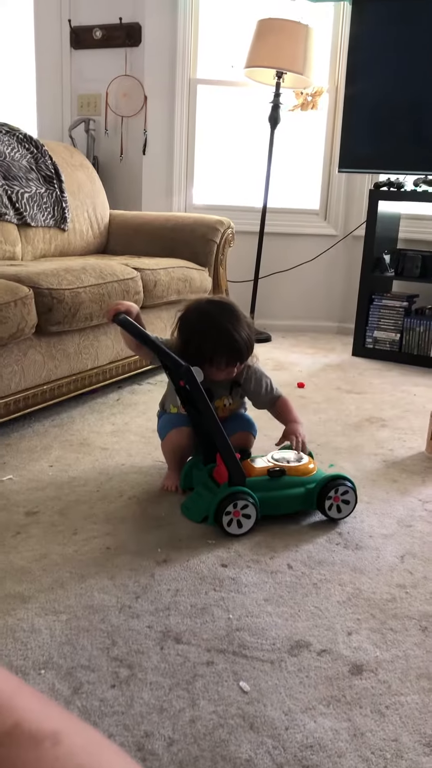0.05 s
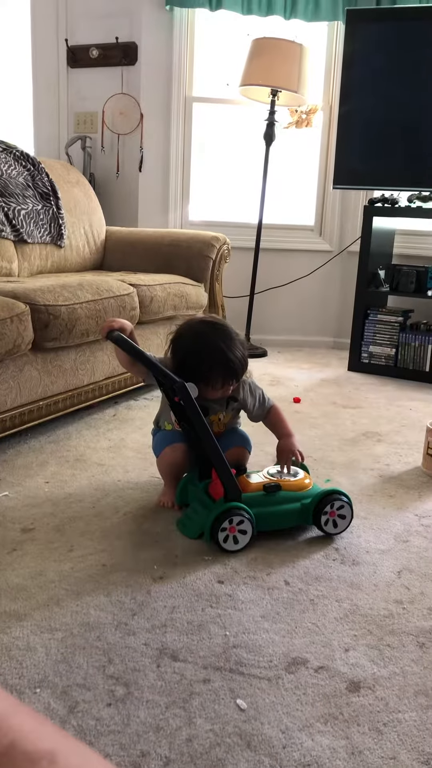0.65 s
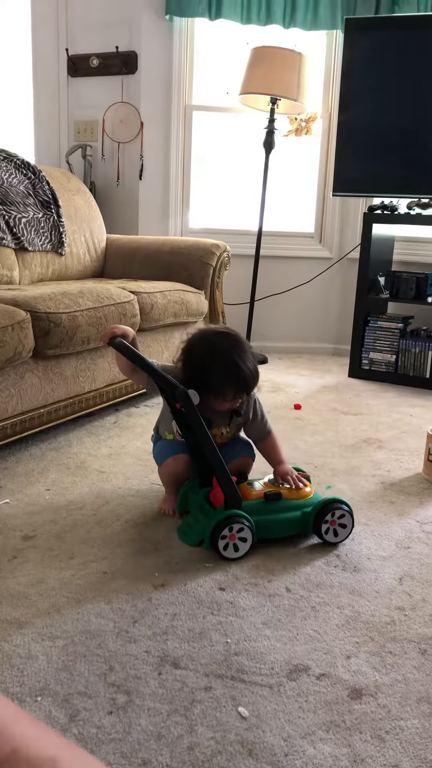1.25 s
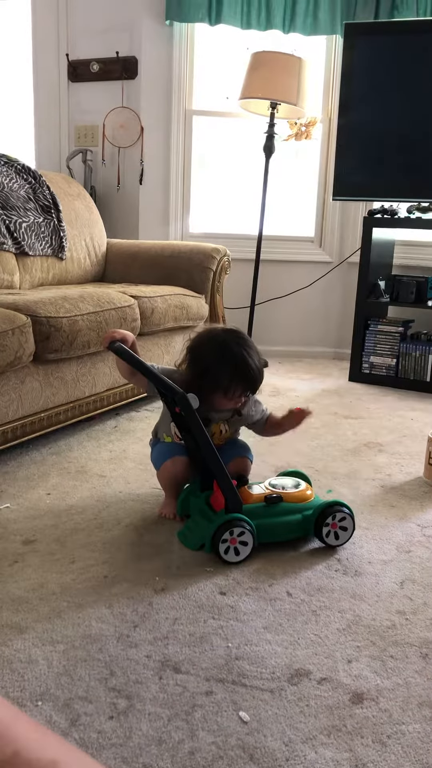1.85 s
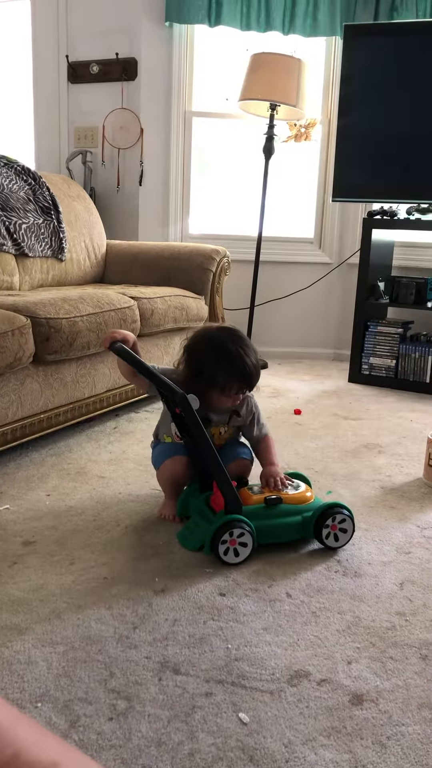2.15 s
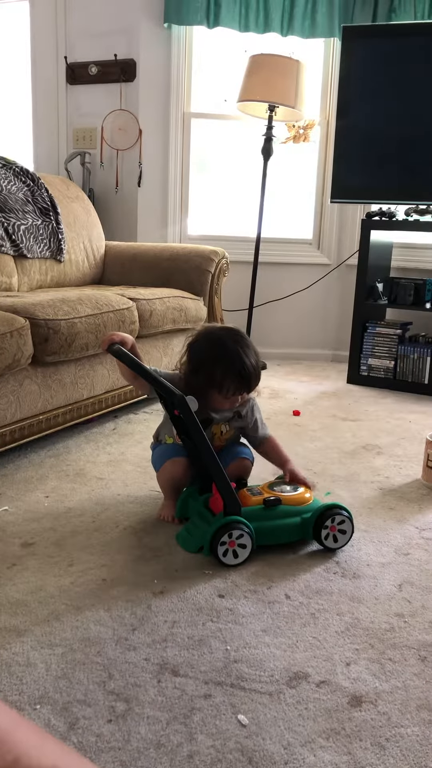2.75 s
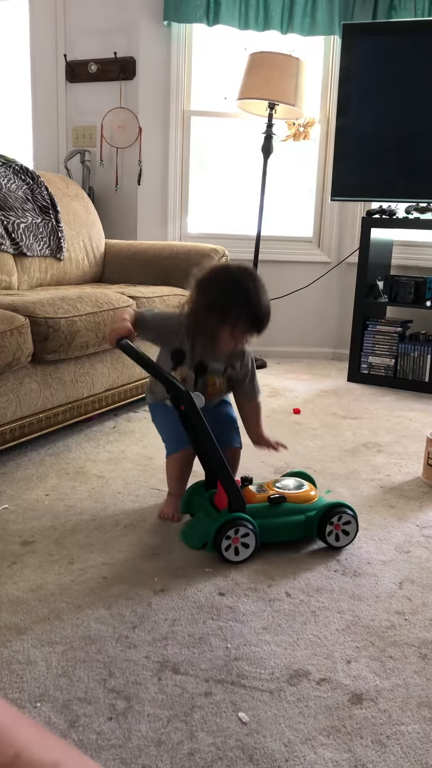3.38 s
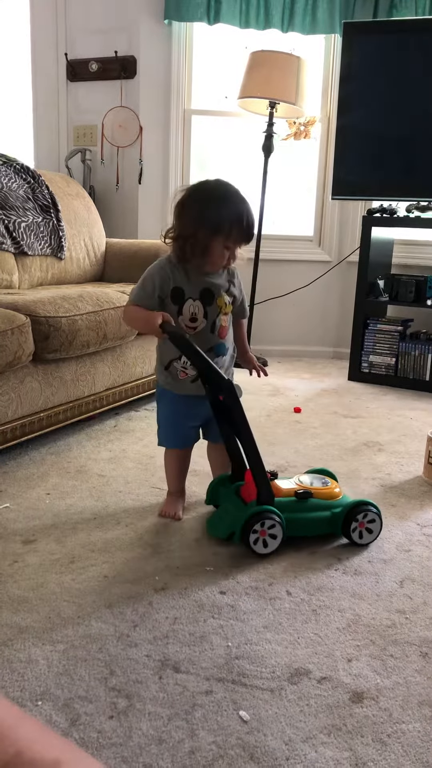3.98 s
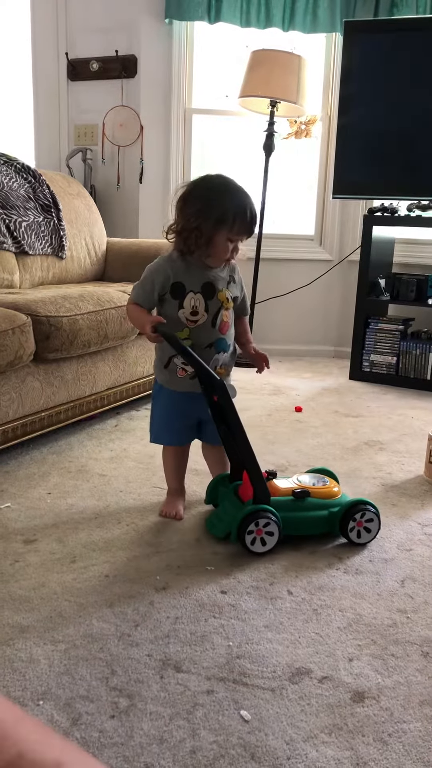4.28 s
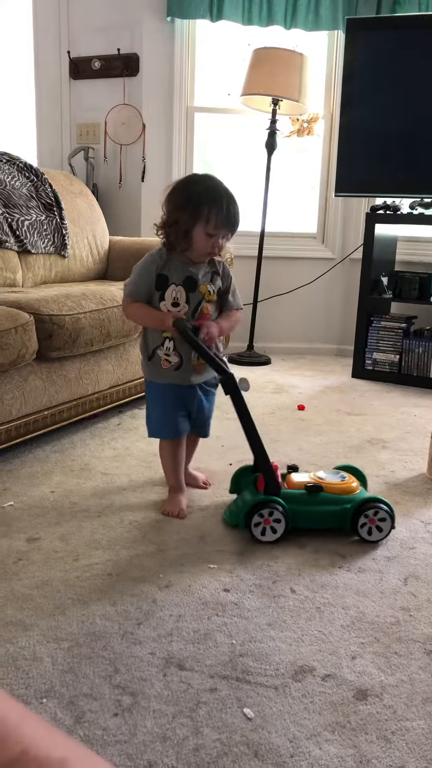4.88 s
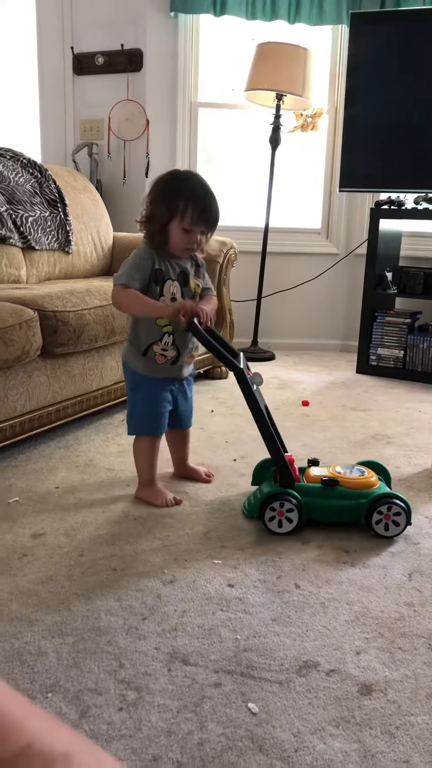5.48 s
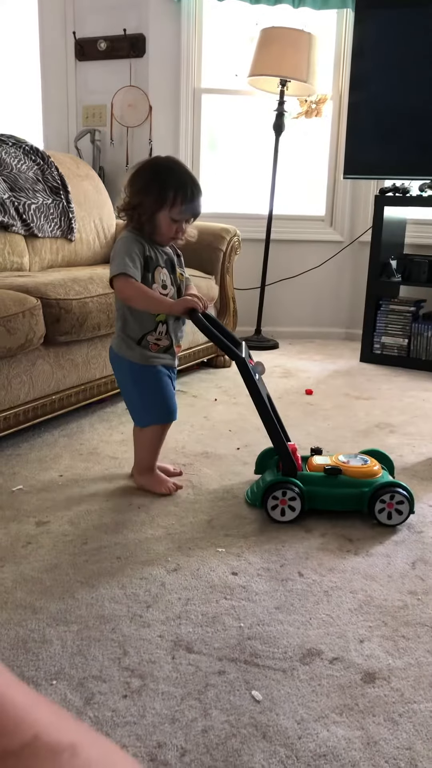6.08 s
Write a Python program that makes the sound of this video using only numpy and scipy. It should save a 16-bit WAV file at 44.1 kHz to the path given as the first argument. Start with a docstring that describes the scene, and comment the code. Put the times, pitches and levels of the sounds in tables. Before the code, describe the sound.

A hollow plastic toy mower is slapped, clatters down on its wheels, creaks and rolls softly over carpet in a quiet room.

```python
"""A hollow plastic toy mower, handled by a toddler on living-room carpet a few steps away.
A hand slaps its top, fingers tick and squeak on it, the deck drops back on its wheels and rattles.
Each blow is a clack of the thin shell plus a thump of the flexing deck. The handle joint snaps and
creaks, then the wheels roll slowly over the pile. The room hums faintly and answers each clack."""
import sys
import numpy as np
from scipy import signal
from scipy.fft import rfft, irfft
from scipy.io import wavfile

SR = 44100
rng = np.random.default_rng(int(sys.argv[2]) if len(sys.argv) > 2 else 0)


def wav_record(signal):
    """Record a signal, one row per channel, as 16-bit PCM in the file named by sys.argv[1]."""
    frames = np.transpose(np.atleast_2d(signal))
    bounded = np.clip(frames, -1, 1)
    # unit amplitude maps onto the largest positive 16-bit level
    quanta = np.round(bounded * 32767).astype(np.int16)
    wavfile.write(sys.argv[1], SR, quanta)


N = 274504
HIT_SAMPLES = SR * 2 // 5

# Spectra. Each row: frequency in Hz, relative level in dB.
CLACK_SPECTRUM = [(40, -24.5), (110, -14.5), (240, -2), (490, -3), (700, -6), (1000, -2.5), (1900, -2),
                  (3000, -3.5), (5500, -7.5), (6900, -9.5), (7700, -10), (8600, -11), (12000, -15.5),
                  (16000, -22)]  # plastic on plastic
DECK_PUSH_SPECTRUM = [(40, -25), (100, -14), (140, -18), (215, 1), (290, 6), (400, 2), (600, -12.5),
                      (1200, -32.5), (4000, -80.5), (16000, -88)]  # whole deck giving way
AIR_SPECTRUM = [(15, -33), (25, -28), (46, -4.5), (113, -8), (140, -8), (204, -3.5), (227, -13),
                (399, -10.5), (495, -16.5), (614, -21.5), (1110, -23.5), (1240, -26), (1750, -30),
                (9050, -37.5), (15500, -39.5)]
PILE_SPECTRUM = [(60, -2), (200, 8), (310, 8.5), (480, 3), (900, 0.5), (1700, -4.5), (2600, -6),
                 (4000, -10.5), (6500, -11), (10000, -11), (16000, -15)]
JOINT_SPECTRUM = [(100, -25), (500, 0), (1000, -1), (1700, 5), (2400, -8.5), (3300, -8), (5500, -18.5),
                  (8000, -25), (16000, -43)]
# Modes. Each row: frequency in Hz, relative level in dB, T60 in seconds.
PANEL_MODES = [(778, 7, 0.25), (928, 13.5, 0.11), (1059, 3.5, 0.38), (1142, 11.5, 0.12), (1307, -16, 0.13),
               (1590, 9, 0.14), (1716, 1.5, 0.16), (1920, -3.5, 0.04), (1905, 0, 0.067), (2550, -5, 0.18),
               (2650, 9, 0.097), (3160, -2, 0.38), (3260, 2, 0.11), (3720, -14, 0.057)]
DECK_MODES = [(62.2, -20, 0.21), (138.5, -4.5, 0.26), (167, -3.5, 0.23), (227, -4, 0.094),
              (250, -6.5, 0.073), (312, -0.5, 0.35), (344, 4.5, 0.18), (390.3, -19, 0.97),
              (406, -12.5, 0.34), (544.5, -27.5, 0.26)]
# Room decay. Each row: frequency in Hz, T60 in seconds.
ROOM_DECAY = [(100, 0.41), (400, 0.35), (1100, 0.43), (2500, 0.37), (5000, 0.37), (8000, 0.31),
              (15000, 0.26)]
# Near surfaces. Each row: nominal delay in seconds, relative level in dB.
ROOM_ECHOES = [(.0049, -3), (.0074, -11.5), (0.0158, -11), (0.0174, -1), (.0222, -32), (0.0373, -19)]
# Opening clack, slap on top, rear then front of the dropping deck. Each row: start in seconds,
# clack level in dB, tilt in dB per octave, treble corner in Hz, part resonance in Hz,
# thump level in dB, bass cut in Hz, lead contact gap in seconds, main contact length in seconds.
HARD_BLOWS = [(-.026, -22.5, -1.5, 11000, 1460, -32, 240, .006, 0.019),
              (2.1044, -15.5, -2.5, 16040, 1855, -20, 71.6, 0.0023, .005),
              (3.656, -29.5, -1, 4260, 2280, -23.5, 210, 0.0024, 0.052),
              (3.679, -15, 0, 9500, 950, -17.5, 257, 0.0035, .014)]
# Steel axle. Each row: start in seconds, frequency in Hz, level in dB.
AXLE_CHINKS = [(-.002, 9830, -45.5), (3.6772, 7750, -32)]
# Household drones. Each row: centre in Hz, width in Hz, level in dB.
DRONES = [(57.7, 3, -82.5), (117.6, 4.9, -75.5), (208.7, 27.5, -71), (8670, 920, -92)]
# Deck rocking. Each row: start in seconds, knock level in dB, treble corner in Hz, thump level in dB.
WHEEL_BUMPS = [(.492, -67, 1470, -50.5), (.724, -53.5, 3000, -44.5), (1.209, -48, 7000, -40),
               (3.346, -51, 3500, -40.5), (3.604, -50, 4420, -47), (3.910, -49, 5060, -36.5),
               (4.201, -52.5, 1800, -39), (4.23, -80, 1180, -52.5), (4.629, -36.5, 3863, -31.5),
               (4.752, -55, 5000, -51), (5.061, -53, 1300, -58), (5.53, -78, 2990, -46),
               (5.986, -73, 3030, -47)]
# Fingers and loose parts. Each row: start in seconds, level in dB, contact length in seconds,
# treble corner in Hz, part resonance in Hz.
SHELL_TICKS = [(1.201, -52.5, 0.022, 8000, 2510), (1.265, -57, 0.055, 3000, 2300),
               (1.738, -59.5, .07, 4000, 2920), (1.764, -64, 0.083, 12000, 2800),
               (2.353, -57.5, 0.053, 3030, 2280), (2.828, -55, 0.074, 9900, 6900),
               (2.914, -42, 0.21, 6640, 1260), (3.502, -57, 0.11, 2940, 2330),
               (3.64, -51, 0.035, 3870, 3030)]
# Skin slides off the top; later a wheel catches.
# Each row: start in seconds, length in seconds, pitch in Hz, relative level in dB.
PLASTIC_SQUEAKS = [(1.601, 0.031, 3780, -64.5), (4.932, 0.021, 1700, -65)]
# Rolling: a nudge, then a push. Each row: time in seconds, relative level in dB.
NUDGE_LEVELS = [(3.08, -81), (3.404, -77), (3.428, -84), (3.58, -77)]
PUSH_LEVELS = [(4.72, -76), (4.95, -71.5), (5.052, -78), (5.144, -72.5), (5.304, -80.5), (5.712, -78),
               (5.956, -81.5), (5.988, -82), (6.2, -82.5)]
# Handle joint. Each row: start in seconds, snap level in dB, relative creak level in dB.
HANDLE_SLIPS = [(3.893, -44, -54.5), (3.9668, -42.5, -56.5), (4.008, -48, -61.5), (4.152, -57, -66)]
# Dragging wheel. Each row: start in seconds, length in seconds, level in dB.
WHEEL_DRAGS = [(5.086, 0.24, -65.5)]


def amp(db):
    """Decibels to gain."""
    return 10 ** (np.asarray(db) / 20)


def unit_rms(x):
    """Scale to mean power 1."""
    return x / np.sqrt(np.mean(x ** 2) + 1e-20)


def unit_energy(x):
    """Scale to total energy 1."""
    return x / (np.linalg.norm(x) + 1e-20)


def lookup(table, hz):
    """Interpolate on a log-frequency axis."""
    table_hz, values = np.transpose(table)
    return np.interp(np.log(hz + 1), np.log(table_hz + 1), values)


def add(mix, start_s, sound):
    """Mix in place; the start may be negative."""
    start = round(start_s * SR)
    sound = sound[max(-start, 0):]
    span = mix[max(start, 0):][:len(sound)]
    span += sound[:len(span)]


def envelope(start_s, length_s, rise_s, fall_s):
    """Trapezoid gain per sample."""
    t = np.arange(N) / SR - start_s
    return np.clip(np.minimum(t / rise_s, (length_s - t) / fall_s), 0, 1)


def colour(x, spectrum, tilt_db_oct=0, corner_hz=np.inf, size=2048):
    """Minimum-phase filter: spectrum, tilt about 2 kHz, treble roll-off."""
    hz = abs(np.fft.fftfreq(size, 1 / SR))
    octaves = np.log2(np.maximum(hz, 500) / 2000)
    gain = amp(lookup(spectrum, hz) + tilt_db_oct * octaves) / np.hypot(1, (hz / corner_hz) ** 2)
    min_phase = np.exp(np.conj(signal.hilbert(np.log(gain))))
    taps = np.fft.ifft(min_phase).real[:size // 2]
    return signal.fftconvolve(x, taps)[:len(x)]


def narrow_noise(hz, width_hz):
    """Noise through one steep resonance."""
    detune = 2 * (np.fft.rfftfreq(N, 1 / SR) - hz) / width_hz
    return unit_rms(irfft(rfft(rng.standard_normal(N)) / (1 + detune ** 2), N))


def slips(per_s, spread_db):
    """Random stick-slip clicks of uneven size."""
    sizes = amp(spread_db * np.minimum(rng.exponential(1, N), 4))
    signs = rng.choice([-1., 1.], N)
    return unit_rms(sizes * signs * (rng.random(N) < per_s / SR))


def ring(modes, t):
    """One decaying sine per mode."""
    hz, db, t60_s = np.transpose(modes)[:, :, None]
    return amp(db - 60 * t / t60_s) * np.sin(2 * np.pi * hz * t)


def strike(modes, t):
    """Each contact point drives the modes with its own signs and strengths."""
    weights = rng.choice([-1., 1.], len(modes)) * rng.uniform(0.33, 1, len(modes))
    return unit_energy(weights @ ring(modes, t))


def room(wet_db, echoes_db=-2, build_s=0.0015):
    """Impulse response: direct sound, near echoes, diffuse tail whose treble dies first."""
    hz, t, bands = signal.stft(rng.choice([-1., 1.], SR // 2), SR, nperseg=256)
    decay = amp(-60 * t / lookup(ROOM_DECAY, hz)[:, None])
    bands = bands * decay * (1 - np.exp(-t / build_s))
    response = amp(wet_db) * unit_energy(signal.istft(bands, SR, nperseg=256)[1])
    response[0] += 1
    for delay_s, db in ROOM_ECHOES:
        response[round(delay_s * rng.uniform(.85, 1.15) * SR)] += amp(db + echoes_db)
    return response


def reverb(x, response):
    """Pass through the room, same length."""
    return signal.oaconvolve(x, response)[:len(x)]


def contact_gain(db):
    """Gain of a contact whose energy, packed into 1 ms, has this level."""
    return amp(db) * np.sqrt(SR / 1000)


def burst(t, t60_s, size=4096):
    """The thin shell spreads a click into a dense, decaying flurry."""
    fade = amp(-60 * t[:size] / t60_s)
    flurry = rng.standard_normal(size) * fade
    for _ in range(3):
        whitened = irfft(np.exp(1j * np.angle(rfft(flurry))), size)
        flurry = whitened * fade ** .25
    return np.pad(unit_energy(flurry), (0, len(t) - size))


def shell_clack(db, contact_s, tilt_db_oct, corner_hz, part_hz):
    """Contact snap, loose-part chatter and panel ring, lifted at the struck part's resonance."""
    t = np.arange(HIT_SAMPLES) / SR
    response = room(wet_db=-1.5, echoes_db=-2.5)
    snap = reverb(burst(t, contact_s), response)
    chatter = amp(-2) * burst(t, t60_s=0.015)
    panels = amp(-12) * strike(PANEL_MODES, t)
    clack = snap + chatter + panels
    resonance = signal.iirpeak(part_hz, Q=5.2, fs=SR)
    clack += amp(4) * signal.lfilter(*resonance, clack)
    return contact_gain(db) * unit_energy(colour(clack, CLACK_SPECTRUM, tilt_db_oct, corner_hz))


def deck_thump(db, bass_cut_hz, flex_s=0.00033):
    """The hollow deck gives way as a whole, then its modes ring on."""
    t = np.arange(HIT_SAMPLES) / SR
    push = unit_energy(colour(room(wet_db=-1)[:len(t)], DECK_PUSH_SPECTRUM))
    ringing = amp(-2) * strike(DECK_MODES, t) * (1 - np.exp(-t / flex_s))
    bass_cut = signal.butter(2, bass_cut_hz, "high", fs=SR)
    return contact_gain(db) * unit_energy(signal.lfilter(*bass_cut, push + ringing))


def blows(glance_ratio=1.7, scatter_oct=0.95):
    """Edges touch, weak and bright; the full weight lands; the shell rebounds, ever weaker and duller."""
    out = np.zeros(N)
    for start_s, db, tilt_db_oct, corner_hz, part_hz, thump_db, cut_hz, gap_s, contact_s in HARD_BLOWS:
        add(out, start_s, shell_clack(db, contact_s, tilt_db_oct, corner_hz, part_hz))
        add(out, start_s, deck_thump(thump_db, cut_hz))
        leads = [(-k * gap_s, db - 7 * k, tilt_db_oct + 1.5 * k, 3.6 * corner_hz) for k in (1, 2)]
        rebounds = [(k * gap_s * 1.8, db - 5.5 - 4.5 * k, tilt_db_oct - 1.5 * k, corner_hz)
                    for k in (1, 2, 3, 4)]
        for delay_s, glance_db, slope_db_oct, treble_hz in leads + rebounds:
            other_part_hz = part_hz * 2 ** (scatter_oct * rng.uniform(-1, 1))
            glance = shell_clack(glance_db, contact_s * glance_ratio, slope_db_oct, treble_hz, other_part_hz)
            add(out, start_s + delay_s, glance)
    return out


def axle_chinks(t60_s=0.011):
    """A jolted steel axle rings briefly in its seat."""
    out, t = np.zeros(N), np.arange(SR // 2) / SR
    for start_s, hz, db in AXLE_CHINKS:
        chink = reverb(ring([(hz, 0, t60_s)], t)[0], room(wet_db=-7))
        add(out, start_s, contact_gain(db) * unit_energy(chink))
    return out


def room_tone(air_db=-66):
    """Steady rumble, hiss and household drones."""
    air = amp(air_db) * unit_rms(colour(rng.standard_normal(N), AIR_SPECTRUM, size=16384))
    return air + sum(amp(db) * narrow_noise(hz, width_hz) for hz, width_hz, db in DRONES)


def wheel_bumps(contact_s=0.029, tilt_db_oct=-3, lead_s=0.006, lag_s=0.00293):
    """A wheel takes up its play, knocks at the axle, then the deck thumps."""
    out = np.zeros(N)
    for start_s, db, corner_hz, thump_db in WHEEL_BUMPS:
        add(out, start_s - lead_s, shell_clack(db - 11, contact_s, tilt_db_oct, corner_hz, part_hz=1100))
        add(out, start_s, shell_clack(db, contact_s, tilt_db_oct, corner_hz, part_hz=840))
        add(out, start_s + lag_s, deck_thump(thump_db, bass_cut_hz=190))
    return out


def shell_ticks(tilt_db_oct=0.5):
    """Light sliding touches, too weak to move the deck."""
    out = np.zeros(N)
    for start_s, db, contact_s, corner_hz, part_hz in SHELL_TICKS:
        add(out, start_s, shell_clack(db, contact_s, tilt_db_oct, corner_hz, part_hz))
    return out


def squeaks():
    """Friction on smooth plastic: a thin squeak with a little scrape."""
    clicks = slips(per_s=390, spread_db=8.5)
    scrape = amp(-7) * unit_rms(colour(clicks, CLACK_SPECTRUM, tilt_db_oct=1, corner_hz=4470))
    out = np.zeros(N)
    for start_s, length_s, hz, db in PLASTIC_SQUEAKS:
        gain = amp(db) * envelope(start_s, length_s, rise_s=0.01, fall_s=0.006)
        out += gain * (narrow_noise(hz, width_hz=600) + scrape)
    return amp(-4) * reverb(out, room(wet_db=-8))


def roll_gain(levels, coast_db_per_s=26.5):
    """Gain per sample, coasting away before and after the table."""
    t = np.arange(N) / SR
    times_s, db = np.transpose(levels)
    outside_s = abs(t - np.clip(t, times_s[0], times_s[-1]))
    return amp(np.interp(t, times_s, db) - coast_db_per_s * outside_s)


def wheel_roll(pile_db=6.5, hubs_db=-7):
    """Carpet fibres flick past the hollow wheels; under the push the hubs rub too."""
    fibres = colour(slips(per_s=2400, spread_db=6.5), PILE_SPECTRUM)
    pile = unit_rms(reverb(fibres, room(wet_db=7)))
    hubs = narrow_noise(hz=3840, width_hz=1900)
    nudge, push = roll_gain(NUDGE_LEVELS), roll_gain(PUSH_LEVELS)
    return amp(pile_db) * np.maximum(nudge, push) * pile + amp(hubs_db) * push * hubs


def handle_joint(creak_t60_s=0.35):
    """The stiff joint snaps under load, then creaks in small, fading slips."""
    t, snaps, load = np.arange(SR) / SR, np.zeros(N), np.zeros(N)
    for start_s, snap_db, creak_db in HANDLE_SLIPS:
        snap = shell_clack(snap_db, contact_s=0.02, tilt_db_oct=0, corner_hz=3800, part_hz=2960)
        add(snaps, start_s, snap)
        add(load, start_s, amp(creak_db - 60 * t / creak_t60_s))
    creak = unit_rms(colour(slips(per_s=220, spread_db=-0.5), JOINT_SPECTRUM))
    return snaps + amp(-4) * reverb(load * creak, room(wet_db=-6))


def wheel_judder(edge_s=0.028):
    """A dragging wheel sets the deck humming."""
    drag = sum(amp(db) * envelope(start_s, length_s, edge_s, edge_s)
               for start_s, length_s, db in WHEEL_DRAGS)
    return drag * narrow_noise(hz=308.6, width_hz=9.1)


def scene():
    """Mono sum at one microphone."""
    impacts = blows() + axle_chinks() + wheel_bumps() + shell_ticks()
    friction = wheel_roll() + wheel_judder() + handle_joint() + squeaks()
    return (impacts + friction + room_tone())[None]


def record(dry, low_hz=32, high_hz=15900):
    """Microphone bass roll-off, then a steep treble limit."""
    thinned = signal.sosfilt(signal.butter(3, low_hz, "high", fs=SR, output="sos"), dry)
    low_pass = signal.firwin(255, high_hz, window=("kaiser", 8), fs=SR)
    return signal.oaconvolve(thinned, low_pass[None], "same")


dry = scene()
out = record(dry)
wav_record(out)
```